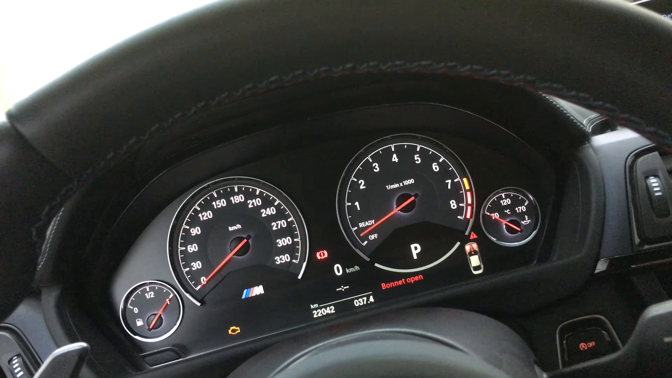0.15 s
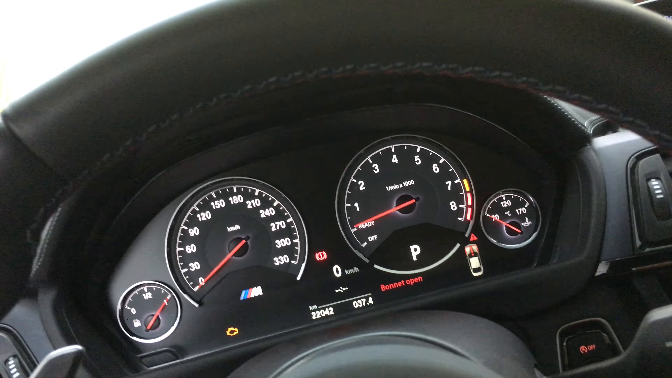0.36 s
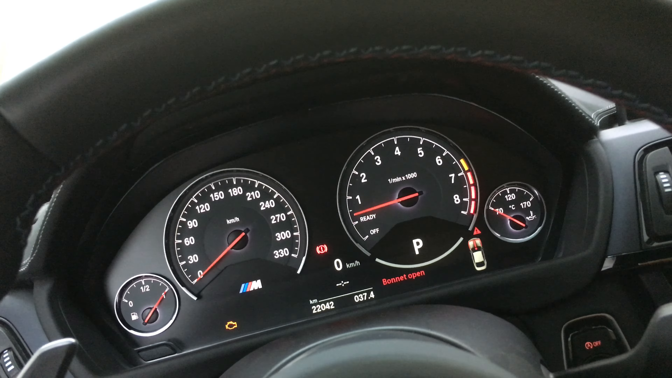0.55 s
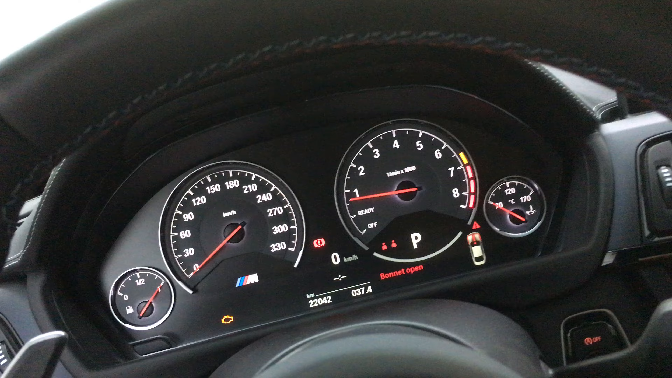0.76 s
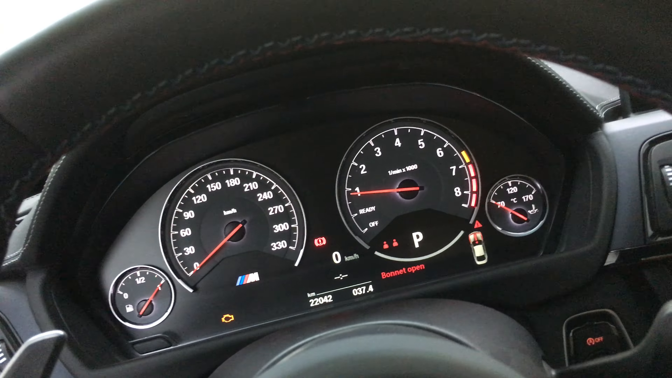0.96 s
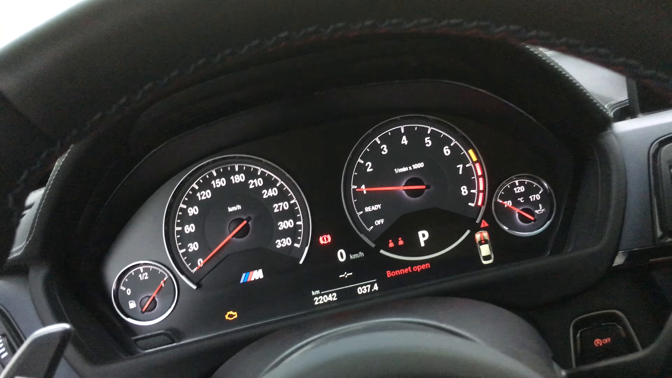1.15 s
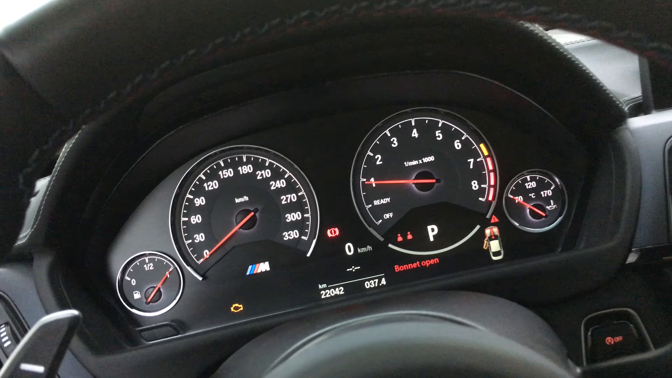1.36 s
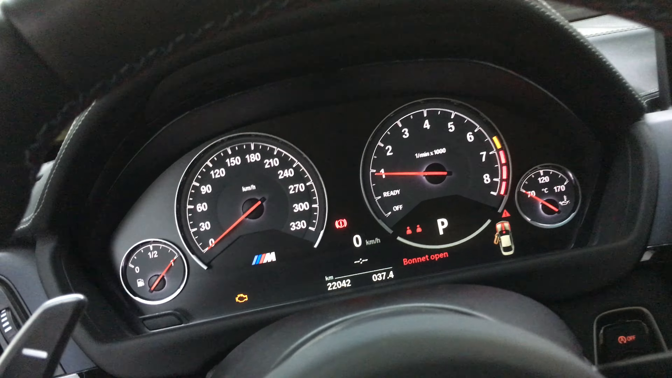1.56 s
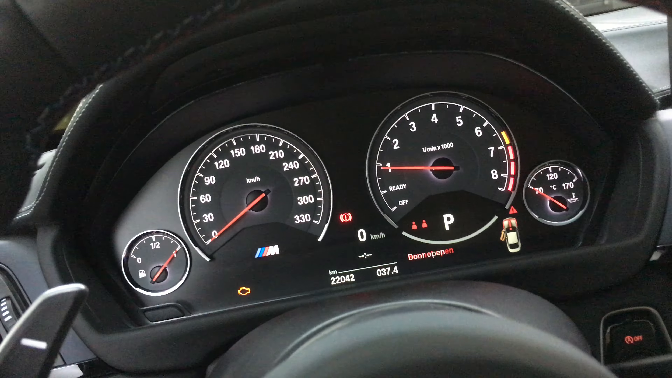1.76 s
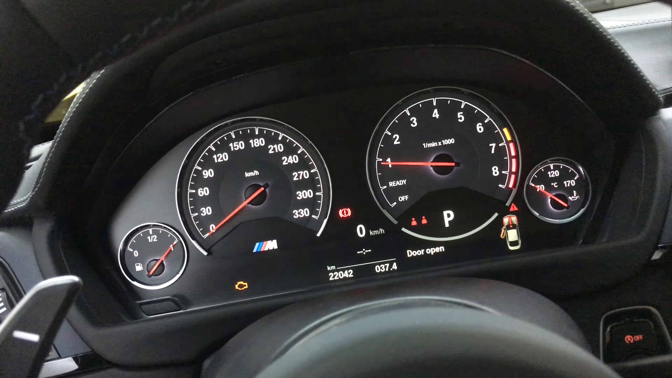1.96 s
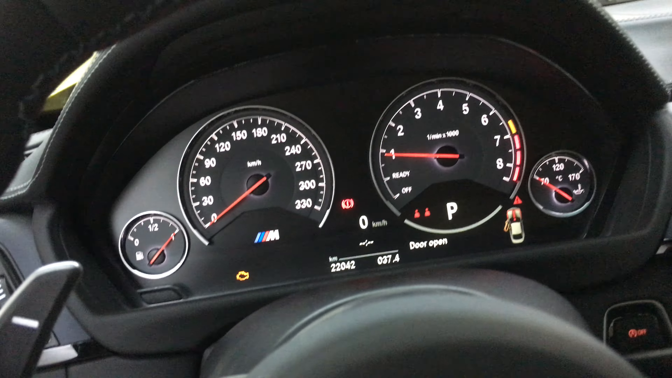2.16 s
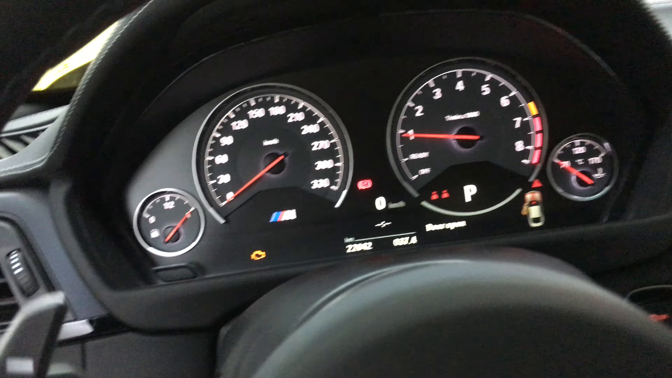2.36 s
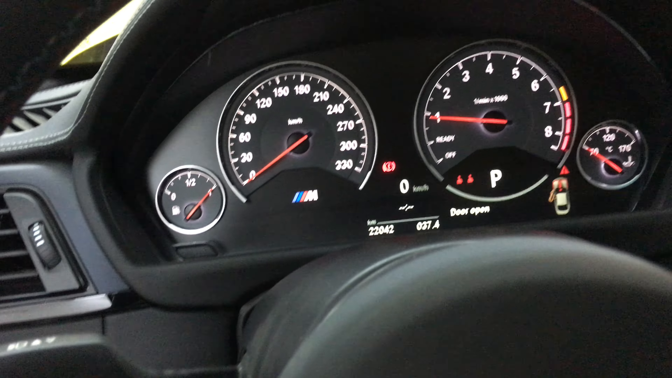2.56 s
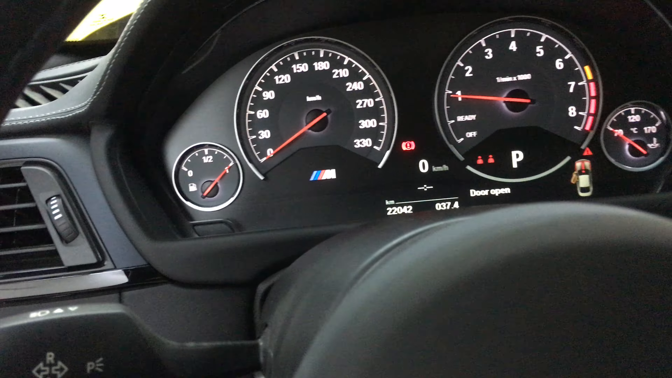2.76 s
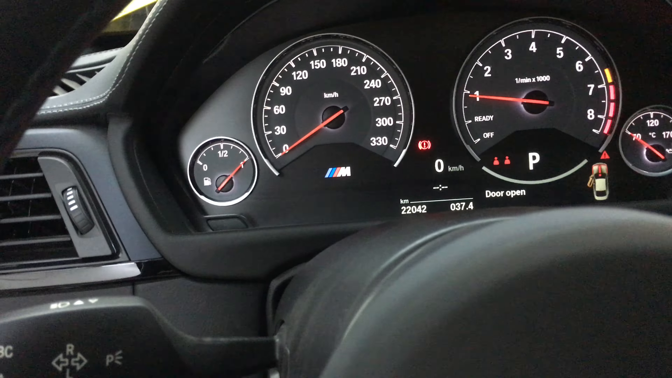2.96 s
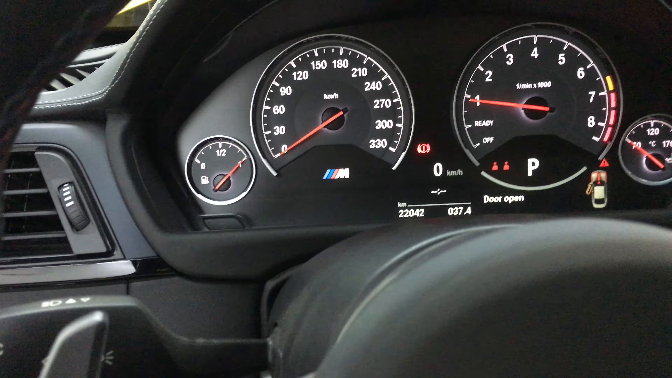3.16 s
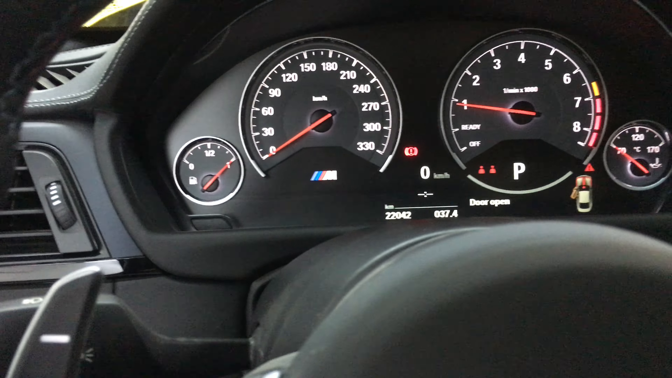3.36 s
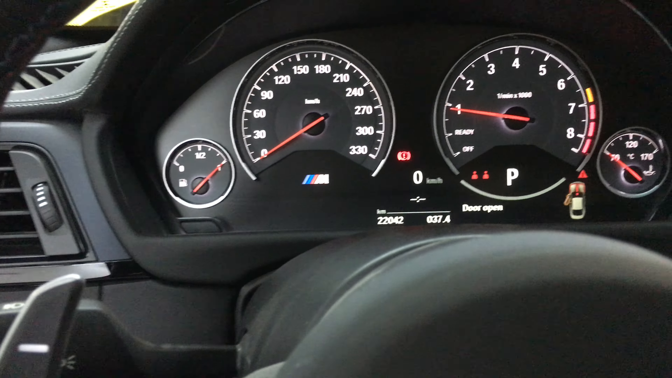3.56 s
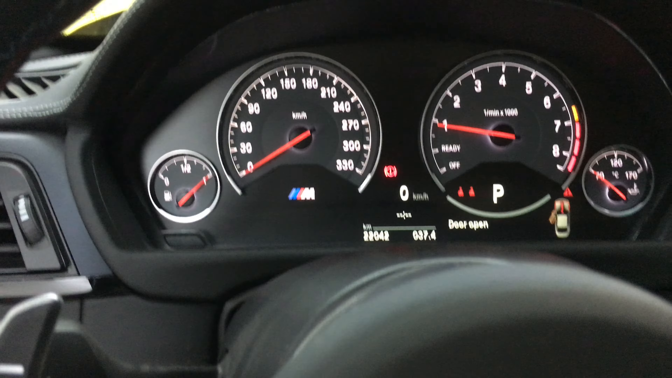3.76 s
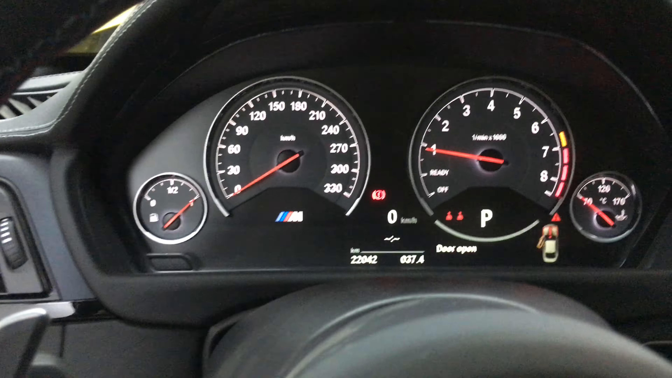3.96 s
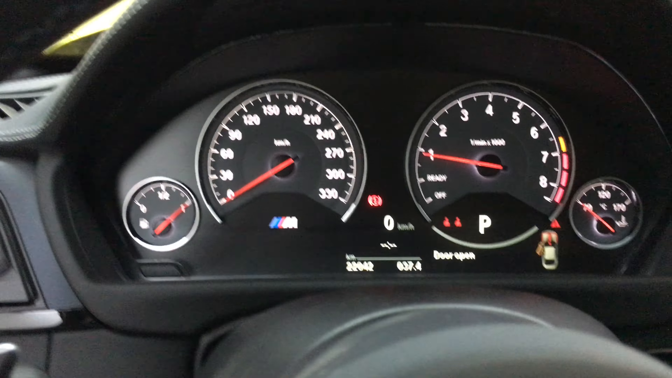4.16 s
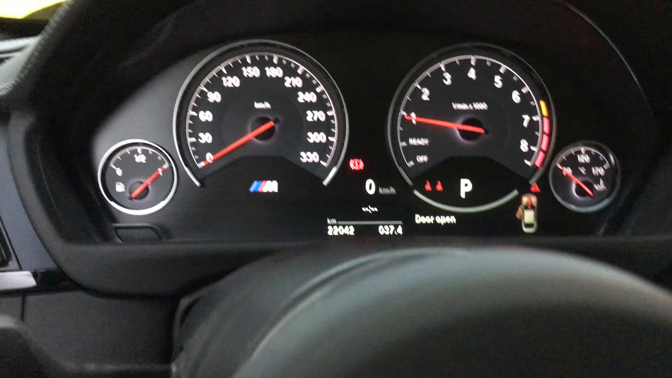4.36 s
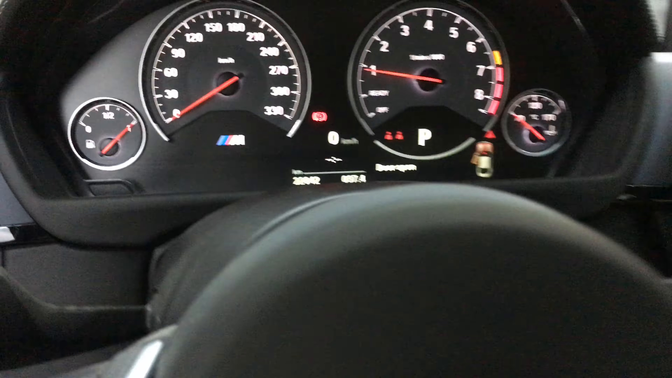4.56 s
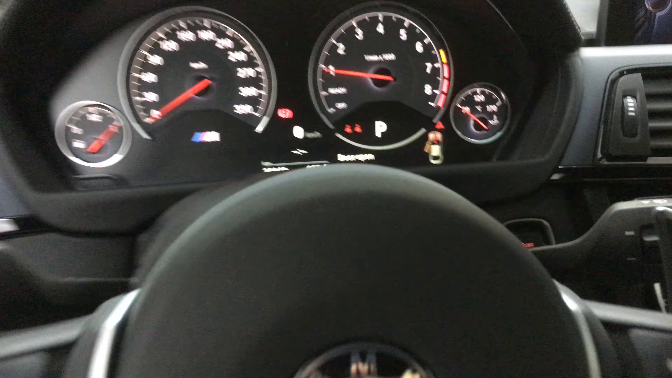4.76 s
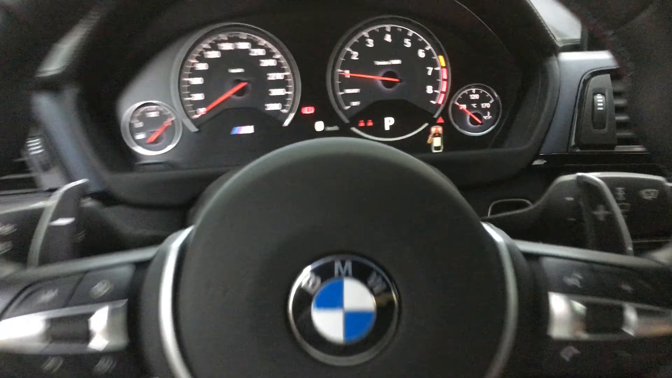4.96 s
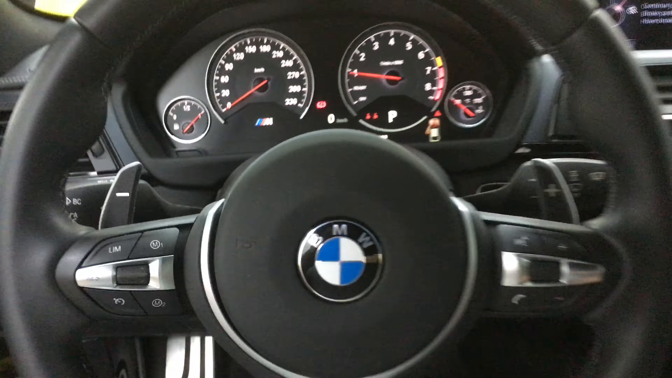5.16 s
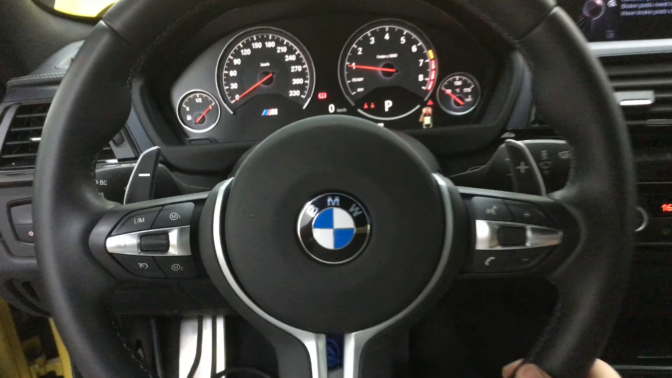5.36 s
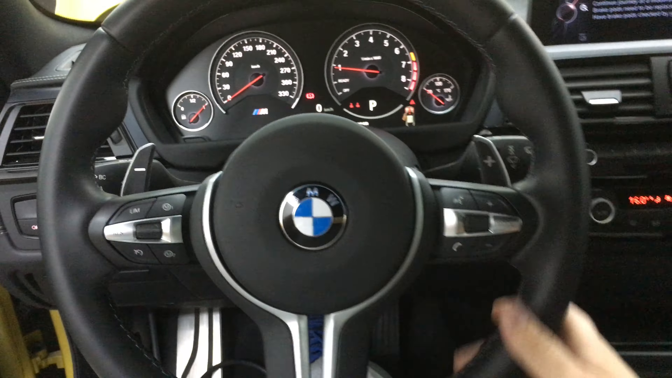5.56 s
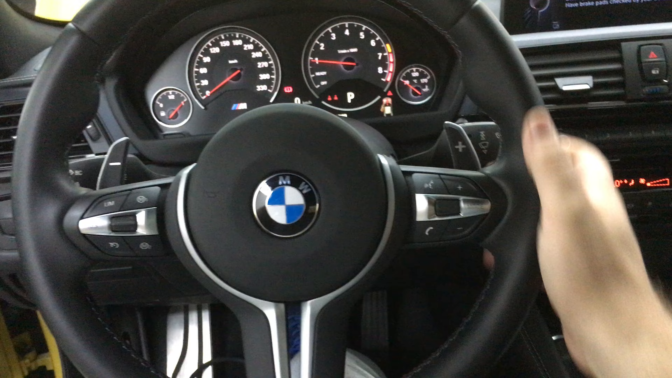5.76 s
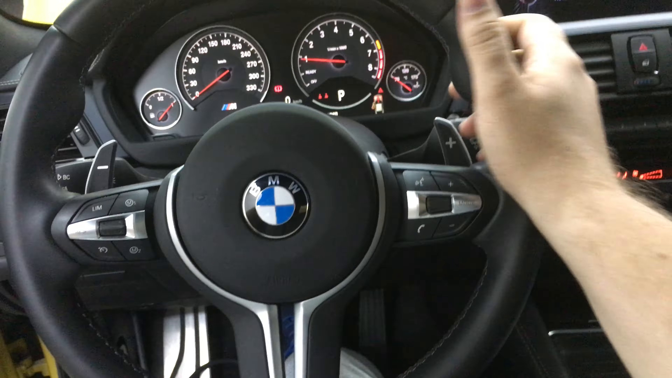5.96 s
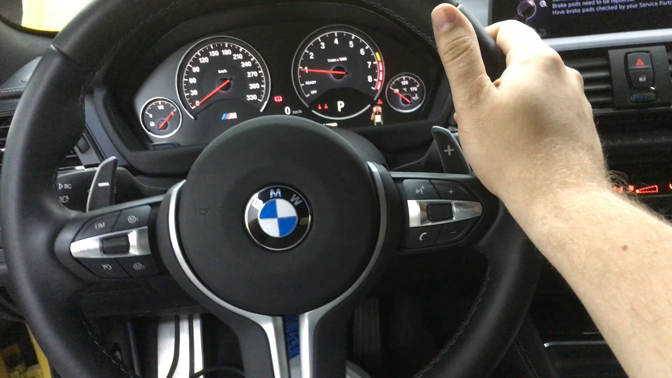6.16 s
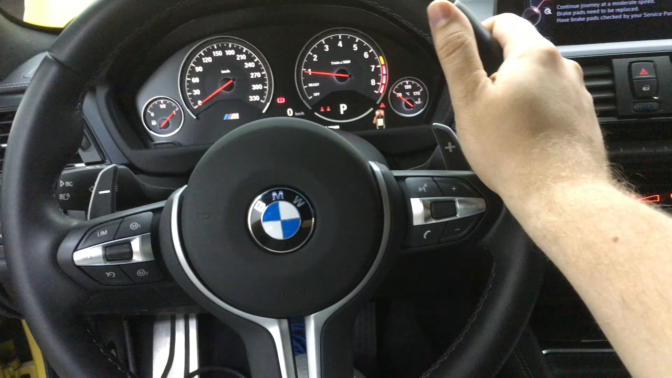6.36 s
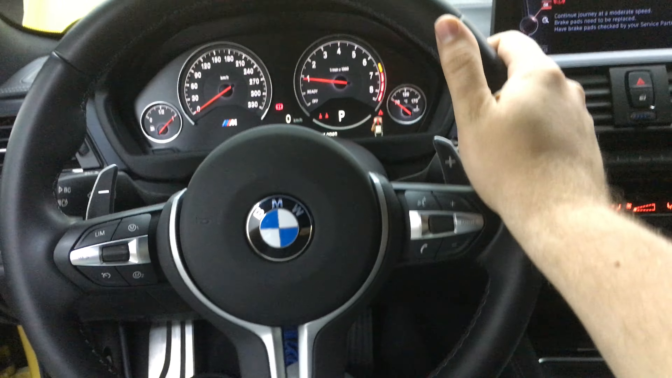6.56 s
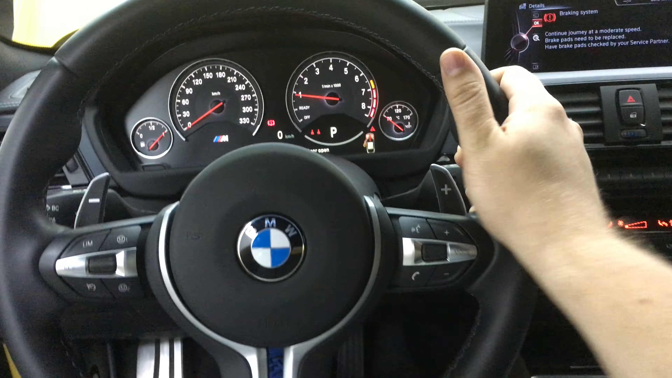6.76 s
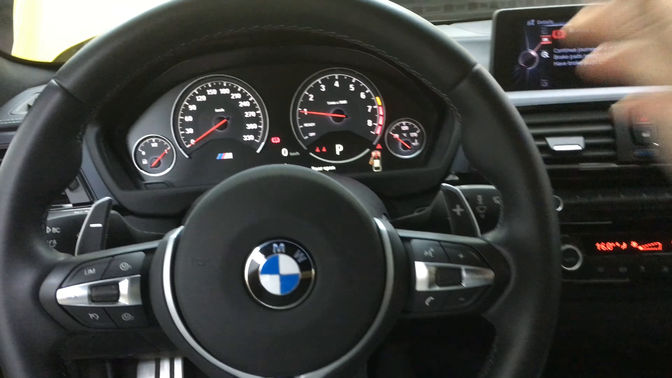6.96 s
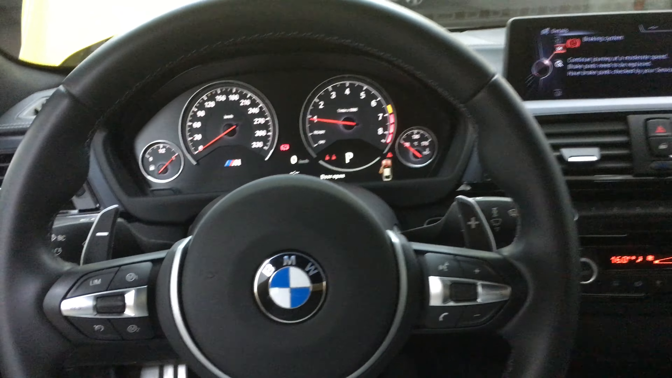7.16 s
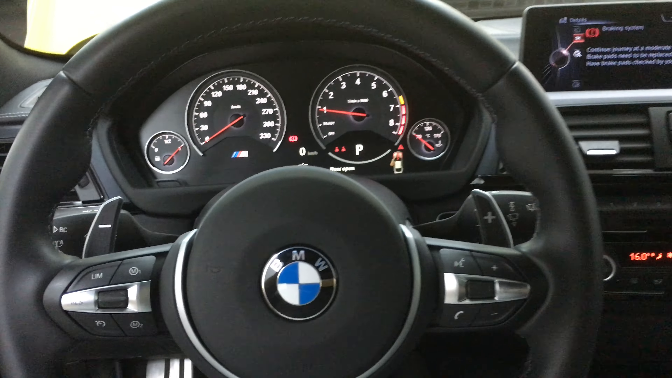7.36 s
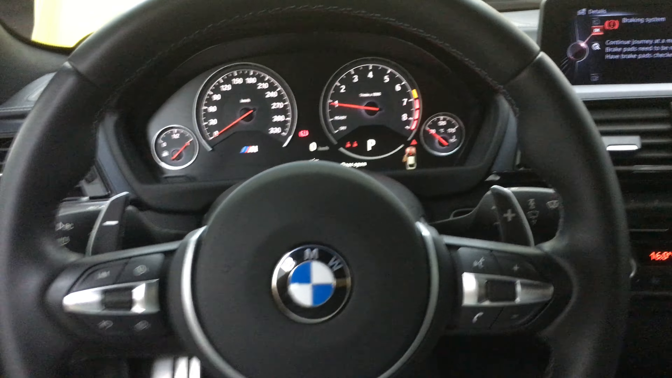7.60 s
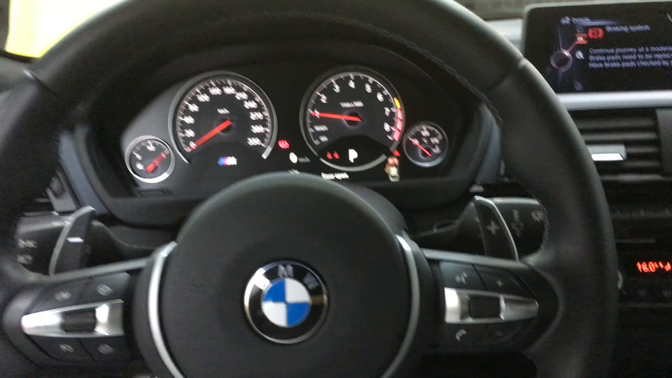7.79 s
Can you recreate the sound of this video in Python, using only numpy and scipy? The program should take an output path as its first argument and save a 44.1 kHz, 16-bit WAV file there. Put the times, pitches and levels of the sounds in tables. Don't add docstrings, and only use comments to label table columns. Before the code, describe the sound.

From the driver's seat, a six-cylinder engine cranks with knocks and whine, fires up in a deep surge, and idles steadily with airy hiss.

```python
import sys
import numpy as np
from scipy import signal
from scipy.fft import rfft, irfft
from scipy.io import wavfile
from scipy.ndimage import uniform_filter1d

SR = 44100
rng = np.random.default_rng(int(sys.argv[2]) if len(sys.argv) > 2 else 0)


def unload_audio(sound):
    columns = np.transpose(np.atleast_2d(sound))
    steps = np.round(np.clip(columns, -1, 1) * 32767)
    wavfile.write(sys.argv[1], SR, steps.astype(np.int16))


def gain_from_db(level_db):
    decades = np.asarray(level_db, float) / 20
    return 10 ** decades


N = 345303
TIME = np.arange(N) / SR

# (frequency [Hz], density [dB per Hz])
QUIET = [(40, -9), (180, -5), (260, -15), (400, -7), (460, -23), (1000, -17.5), (1600, -21.5), (2100, -20),
         (2600, -32), (4200, -34), (15600, -55)]
QUIET_DB = -47

# (time [s], peak level [dB], length [s])
RUBS = [
    (4.15, -73, .3),
    (4.5, -73, .35),
    (5.6, -73, .9),
]
# (frequency [Hz], density [dB per Hz])
FIZZ = [(9000, -25), (12000, -7), (13500, 0), (15800, -4)]
# (time [s], peak level [dB], length [s])
RUSTLES = [(2.225, -56.5, .05), (2.6, -68, .03), (2.87, -64, .06), (4.25, -68, .04), (4.37, -68, .02),
           (4.46, -66, .02), (4.66, -69, .1), (5.64, -67, .04), (6.02, -67, .05), (6.94, -66, .02),
           (7.78, -66, .05)]
# (frequency [Hz], density [dB per Hz])
SWISH = [(2500, -20), (5000, -1), (9000, -3), (13000, -8), (15700, -10)]

# (frequency [Hz], density [dB per Hz])
BAY_NEAR = [(250, -42), (420, -61), (496, -8), (543, -12.5), (713, -8), (881, -9), (1070, -8.5),
            (1370, -11.5), (1690, -11.5), (2690, -20), (2910, -19), (5910, -28), (7420, -33), (8370, -30),
            (15800, -43)]
# (frequency [Hz], density [dB per Hz])
BAY_FAR = [(250, -32), (420, -17), (460, -4.5), (511, 2.5), (692, -6), (842, 2.5), (964, -2), (1160, 0.5),
           (1280, -2.5), (1640, -2), (2540, -10.5), (3990, -15.5), (7760, -24.5), (8500, -22), (15800, -35)]
# (frequency [Hz], width [Hz], level near [dB], level farther back [dB])
DUCTS = [(406, 72, -17.5, -9), (675, 124, -3, -8.5), (803, 12, -20.5, -15), (961.5, 11, -11, -34),
         (1092, 7.8, -16.5, -20), (1184, 21, -15.5, -14), (1436, 5.5, -15, -17), (1588, 26, -37, -11.5),
         (1660, 260, -12, -17.5), (3960, 140, -20.5, -22), (5890, 40, -24.5, -27), (8420, 1150, -22.5, -22),
         (11640, 760, -25.5, -27)]
BAY_DB, BAY_FAR_DB = -48.5, 1.27
SURGE_DB, SURGE_S = 15, 0.14
FLARE_DISTANCE, FLARE_DUCT_DB = 0.28, -1

# (frequency [Hz], density [dB per Hz])
GRIND = [(260, -23), (450, -8), (501, -11), (640, -8), (734, -8), (817, -7), (982, -5.5), (1060, -9),
         (1140, -5), (1340, -4.5), (2800, -20.5), (3640, -40), (6160, -120)]
# (frequency [Hz], density [dB per Hz])
BRUSHES = [(1470, -35), (2500, -12), (2680, -6.5), (3750, -5), (5010, -10), (6550, -12), (7130, -16.5),
           (8970, -13.5), (10400, -18.5), (12500, -24), (15800, -28)]
# (frequency [Hz], width [Hz], level [dB])
BODY_MODES = [(100, 49, -3.5), (146, 32, -3), (173.6, 22.5, -4.5), (207, 18, -2), (273.6, 40, -8),
              (295, 34, -12.5)]
# (first touch [dB], cranking [dB], extra while biting [dB], sag [dB/s], extra per firing [dB])
GRIND_DB = (-62, -41, 5, -0.5, -16)
HISS_DB = (-70, -48, 2.5, -4.5, -2.3)
SHUDDER_DB = (-56, -31, 3, -3, 7)
ENGAGE_S, BITE_S, BITE_HOLD_S, BITE_FADE_S = .066, 0.11, 0.21, 0.048
RELEASE_S, RELEASE_DB = (.84, .89), -6.5

# (time [s],
# peak level [dB], frequency [Hz], length [s])
KNOCKS = [(.005, -55, 2157, .07), (.076, -29.5, 114, 0.02), (.08, -43, 940, .015), (.08, -37, 1410, .008),
          (.093, -31, 1138, 0.056), (.113, -21.5, 207, 0.064), (.14, -25.5, 146, 0.15),
          (.15, -39, 632, .05), (.178, -18, 200.6, 0.0146), (.19, -55, 2180, 0.11),
          (.288, -32.5, 139, 0.13), (.512, -22, 172.1, 0.095), (.62, -21, 151.5, 0.018),
          (.716, -20.5, 142, 0.033), (2.45, -66, 127.5, .23), (4.466, -37, 910, .007),
          (7.14, -41, 54.4, 0.19), (7.5, -38, 55.4, 0.26)]
# (time [s], peak level [dB], frequency [Hz], length [s])
WHINES = [
    (0.09, -38, 970, 0.087),
    (0.25, -42, 846, 0.13),
    (0.353, -46, 944, 0.098),
    (0.438, -55, 997, 0.081),
]
# (frequency multiple [1], level [dB])
WHINE_PARTIALS = [(1, 3.5), (1.52, -5), (1.991, -3)]
# (time [s], thump level [dB], manifold ring level [dB], length [s])
FIRINGS = [
    (0.551, -21, -37.5, 0.071),
    (.612, -28, -33, 0.055),
    (0.709, -24, -37.5, 0.087),
    (0.797, -33, -42, 0.037),
    (0.857, -28, -47, .06),
    (0.924, -31.5, -41, 0.05),
]
# (frequency [Hz], level [dB])
THUMP = [(98, -0.27), (168, -1.4)]
THUMP_LONGER_S = 0.057
# (frequency [Hz], level [dB])
RING = [(538, -15), (660, 1), (798, -2.5)]

# (frequency [Hz], density [dB per Hz])
RUMBLE = [(18, -9), (36, -9), (52, -4), (75, -13), (110, -9), (200, -1), (250, -10), (300, -9), (380, -12),
          (450, -22), (600, -32)]
RUMBLE_IDLE_DB, RUMBLE_FLARE_DB, RUMBLE_CATCH_DB = -45., -47., 5.
STUMBLE_S, STUMBLE_SPREAD_S, STUMBLE_DB = 2.6, 0.16, 3.5

# (time [s], rate [Hz])
SPEED = [(0.5, 7.003), (0.7, 7.597), (0.9, 8.593), (1.0, 8.823), (1.2, 8.689), (1.6, 7.682), (1.8, 7.814),
         (2.4, 7.785), (2.8, 7.756), (3.2, 7.733), (4.1, 7.733), (4.7, 7.836), (5.5, 8.079), (6.0, 8.011),
         (6.3, 8.106), (6.7, 7.968), (7.0, 7.929), (7.5, 8.037)]
# (multiple of the cycle [1], level in the flare [dB], near the dash [dB], farther back [dB])
ORDER_DB = [(7, -59.8, -43.0, -46.6), (9, -51.4, -54.1, -50.2), (12, -46.5, -37.0, -39.8),
            (15, -41.5, -45.1, -38.3), (18, -47.0, -41.0, -42.1), (21, -53.1, -38.8, -43.4),
            (24, -34.0, -34.1, -36.6), (27, -42.7, -39.6, -42.4), (30, -47.6, -43.3, -49.6),
            (33, -59.1, -46.5, -59.1), (36, -65.9, -53.2, -59.6), (39, -56.0, -62.9, -63.0),
            (42, -66.8, -59.2, -55.4), (45, -60.4, -67.7, -54.9), (48, -74.0, -61.1, -56.4),
            (66, -58.7, -65.1, -61.7), (69, -78.6, -60.9, -72.5), (72, -62.0, -55.5, -62.1),
            (75, -63.8, -59.3, -66.2), (78, -66.4, -62.6, -61.9), (81, -59.9, -54.4, -61.8),
            (84, -66.3, -52.6, -66.2), (87, -54.1, -63.4, -71.3), (90, -70.0, -51.9, -66.7),
            (93, -70.9, -60.9, -63.4), (96, -71.3, -53.7, -70.5), (99, -74.9, -63.4, -63.2),
            (105, -74.9, -58.5, -65.1)]
SPREAD = [(.1501, -1.0103, 1.5655, .726, 1.7525, -2.8833, .0839),
          (4.0905, -.0921, -.8878, -1.7596, 3.4014, -4.4254, -.1234)]
BETWEEN, LOUDEST = range(13, 39), 25
BETWEEN_DB, SLOPE_DB = (-56, -49, -53), 1.1
# (time [s], level [dB])
BOOM = [(.2, -62), (.255, -35), (.44, -36), (.53, -32), (.6, -23), (.8, -24.5), (.835, -19), (.92, -21),
        (1.1, -19), (1.33, -21.5), (1.53, -34), (1.7, -37), (7.1, -43), (7.75, -43.5)]
BOOM_HZ, BOOM_FAR_DB = 53.0, 1.2
CATCH_S, REGULAR_S, UNSTEADY_DB = 0.58, 0.875, -33
FLARE_DB = 1
SETTLE_S, SETTLE_DIP_DB = (1.19, 1.44), -4.5
MOVE_S = (4.63, 5.33)


def evened(x):
    return x / np.sqrt(np.mean(x ** 2) + 1e-20)


def curves(rows):
    s, *columns = np.transpose(rows)
    return [np.interp(TIME, s, c) for c in columns]


def ramp(start, end):
    return np.clip((TIME - start) / (end - start), 0, 1)


def swell(start, length):
    return np.sin(np.pi * ramp(start, start + length))


def noise(points, patchy_db):
    f, db = np.transpose(points)
    hz = np.fft.rfftfreq(2048, 1 / SR)
    a, b, patches = rng.standard_normal((N // 512 + 5, 1025, 3)).T
    patches = uniform_filter1d(patches, size=20, axis=0)
    patches = evened(uniform_filter1d(patches, size=8, axis=1))
    colour_db = np.interp(np.log(hz + 1), np.log(f + 1), db, left=-70, right=-70)
    spectra = (a + 1j * b) * gain_from_db(colour_db[:, None] + patchy_db * patches)
    return evened(signal.istft(spectra, nperseg=2048, noverlap=1536)[1][:N])


def resonate(x, hz, width):
    band = [hz - width / 2, hz + width / 2]
    sos = signal.butter(1, band, "bandpass", fs=SR, output="sos")
    return evened(signal.sosfilt(np.vstack([sos, sos]), x))


def drift(rate):
    knots = np.arange(0, N / SR + 1, 1 / 50)
    waves = np.zeros(len(knots))
    for f in rate * np.geomspace(.08, 1, 16):
        waves += np.sin(2 * np.pi * (f * knots + rng.random())) / np.sqrt(f)
    return np.interp(TIME, knots, evened(waves))


def quiet_cabin():
    return gain_from_db(QUIET_DB - 15 * ramp(.1, .2)) * noise(QUIET, 1.5)


def rubs():
    return noise(FIZZ, 1.5) * sum(gain_from_db(db) * swell(s, length) for s, db, length in RUBS)


def rustles():
    return noise(SWISH, 2.7) * sum(gain_from_db(db) * swell(s, length) for s, db, length in RUSTLES)


def state():
    settled = ramp(*SETTLE_S)
    dip = settled * (1 - ramp(SETTLE_S[1], SETTLE_S[1] + 0.32))
    running_db = UNSTEADY_DB * (1 - ramp(CATCH_S, REGULAR_S))
    running_db += FLARE_DB * (1 - settled) + SETTLE_DIP_DB * dip
    return running_db, settled, ramp(*MOVE_S)


def bay(cycles):
    _, settled, distance = state()
    flaring = ramp(.85, 1.) * (1 - settled)
    distance = np.clip(distance + FLARE_DISTANCE * flaring, 0, 1)
    near = gain_from_db(1.5) * noise(BAY_NEAR, 0.77)
    far = gain_from_db(1.0) * noise(BAY_FAR, 0.47)
    wide = np.sqrt(1 - distance) * near + np.sqrt(distance) * far
    ducts = np.zeros(N)
    for hz, width, near_db, far_db in DUCTS:
        duct_db = near_db + distance * (far_db - near_db)
        ducts += gain_from_db(duct_db) * resonate(rng.standard_normal(N), hz, width)
    puffs = evened(1 + .15 * np.cos(2 * np.pi * 3 * cycles) + .15 * np.cos(2 * np.pi * 12 * cycles))
    surge_db = SURGE_DB * np.exp(-np.maximum(TIME - CATCH_S, 0) / SURGE_S)
    level_db = BAY_DB + BAY_FAR_DB * distance + surge_db + .35 * drift(8.0)
    return ramp(.5, .81) * gain_from_db(level_db) * (wide + puffs * gain_from_db(FLARE_DUCT_DB * flaring) * ducts)


def cranking(touch_db, crank_db, bite_db, sag_db, jolt_db):
    after_bite = np.maximum(TIME - BITE_HOLD_S, 0)
    bite = np.exp(-after_bite / BITE_FADE_S)
    jolts = sum(swell(s, length) for s, _, _, length in FIRINGS)
    loaded_db = crank_db + bite_db * bite + sag_db * after_bite + jolt_db * jolts
    loaded_db += RELEASE_DB * ramp(*RELEASE_S)
    return touch_db + (loaded_db - touch_db) * np.sqrt(ramp(ENGAGE_S, BITE_S))


def starter():
    on = ramp(.065, .0726) * (1 - ramp(.99, 1.2))
    impulses = rng.standard_normal(N) * (rng.random(N) < 350 / SR)
    body = evened(sum(gain_from_db(db) * resonate(impulses, hz, width) for hz, width, db in BODY_MODES))
    shaking = gain_from_db(cranking(*SHUDDER_DB) - 6.0) * body * (1 - ramp(.92, .98))
    roughness = evened(1 + 0.14 * drift(41.0))
    grind = gain_from_db(cranking(*GRIND_DB) - 2.5) * noise(GRIND, 1.5) * roughness * (1 - ramp(.58, .75))
    hiss = gain_from_db(cranking(*HISS_DB) - 0.5) * noise(BRUSHES, 1.4)
    return on * (grind + hiss + shaking)


def tones():
    whines = [(s, db + d, hz * k, length) for s, db, hz, length in WHINES for k, d in WHINE_PARTIALS]
    thumps = [(s, db + d, hz, length + THUMP_LONGER_S) for s, db, _, length in FIRINGS for hz, d in THUMP]
    rings = [(s, db + d, hz, length) for s, _, db, length in FIRINGS for hz, d in RING]
    return KNOCKS + whines + thumps + rings


def knocks_and_whines():
    out = np.zeros(N)
    waver = 0.0098 * drift(24.27)
    flutter = gain_from_db(2.5 * evened(uniform_filter1d(rng.standard_normal(N), size=350)))
    for s, db, hz, length in tones():
        envelope = np.sin(np.pi * ramp(s, s + length) ** 0.95)
        turns = np.cumsum(hz * (1 + waver)) / SR + rng.random()
        out += gain_from_db(db - 4.0) * envelope * np.sin(2 * np.pi * turns)
    return flutter * out


def rumble():
    level_db = RUMBLE_FLARE_DB + RUMBLE_CATCH_DB * (1 - ramp(.6, 1.2))
    level_db += (RUMBLE_IDLE_DB - RUMBLE_FLARE_DB) * ramp(1.2, 1.6)
    level_db += STUMBLE_DB * np.exp(-((TIME - STUMBLE_S) / STUMBLE_SPREAD_S) ** 2)
    return ramp(.53, 0.74) * gain_from_db(level_db) * noise(RUMBLE, 2.6)


def orders():
    between = [(k, *(np.array(BETWEEN_DB) - SLOPE_DB * abs(k - LOUDEST))) for k in BETWEEN if k % 3]
    return ORDER_DB + between


def phase_of(k, distance):
    bank = k / 3
    near, far = np.dot(SPREAD, [1, bank, bank ** 2, k % 6 == 3, k % 3 == 1, k % 3 == 2, bank ** 3])
    return near + distance * np.angle(np.exp(1j * (far - near)))


def boom(cycles, speed, distance):
    held = np.cumsum(np.maximum(BOOM_HZ - 6 * speed, 0) * (TIME < .95)) / SR
    level_db = curves(BOOM)[0] + BOOM_FAR_DB * distance
    turns = 6 * cycles + held - held[-1]
    return gain_from_db(level_db) * np.cos(2 * np.pi * turns + phase_of(6, distance))


def engine(cycles, speed):
    running_db, settled, distance = state()
    out = boom(cycles, speed, distance)
    for k, flare, near, far in orders():
        wobble_db = (.7 + 1.4 * (k % 3 > 0) + .022 * k + .4 * distance) * drift(2.5)
        idle_db = near + distance * (far - near)
        level_db = running_db + flare + settled * (idle_db - flare) + wobble_db
        phase = phase_of(k, distance) + .004 * k * drift(7.0)
        out += gain_from_db(level_db) * np.cos(2 * np.pi * k * cycles + phase)
    return np.sqrt(2) * out


def scene():
    speed = curves(SPEED)[0]
    cycles = np.cumsum(speed) / SR
    handling = rubs() + rustles()
    starting = starter() + knocks_and_whines()
    running = bay(cycles) + rumble() + engine(cycles, speed)
    return (quiet_cabin() + handling + starting + running)[None]


def roll_off(x):
    return signal.sosfilt(signal.butter(12, 15700, fs=SR, output="sos"), x)


def record(dry):
    hz = np.fft.rfftfreq(N, 1 / SR)
    dip_db = -5.5 * np.exp(-((hz - 10470) / 280) ** 2)
    heard = irfft(rfft(dry) * gain_from_db(dip_db), N)
    return roll_off(heard)


dry = scene()
out = record(dry)
unload_audio(out)
```